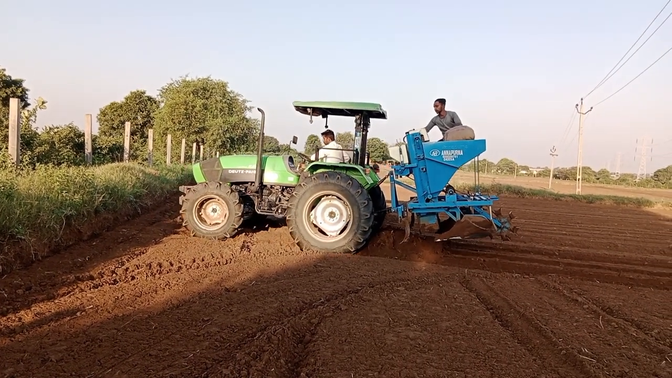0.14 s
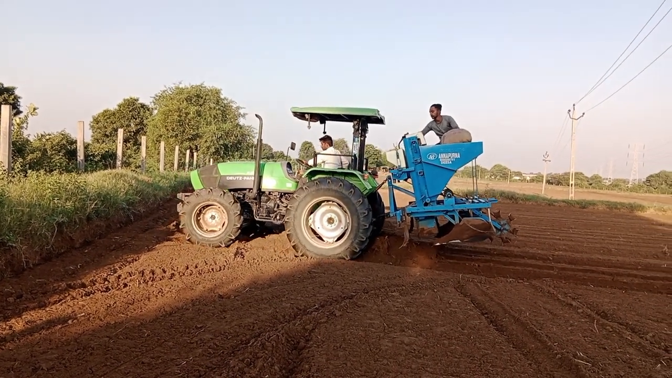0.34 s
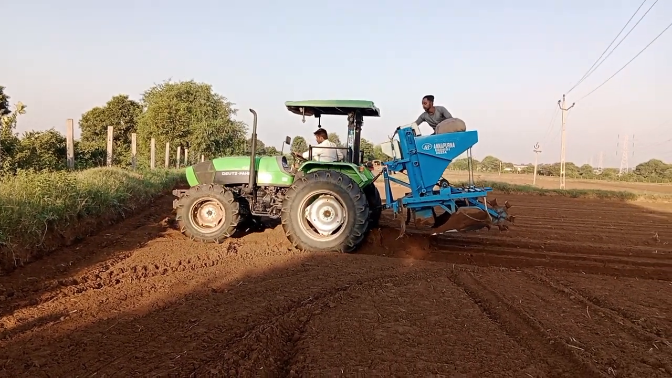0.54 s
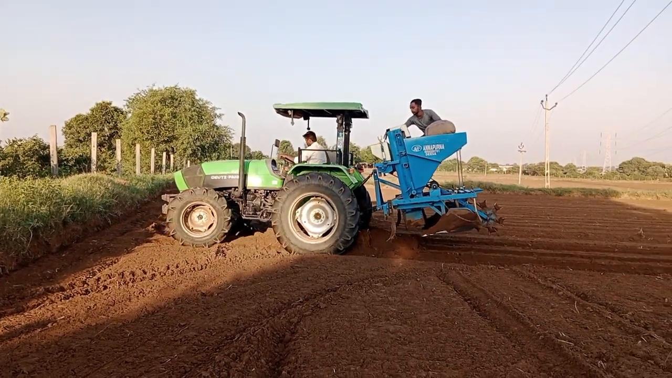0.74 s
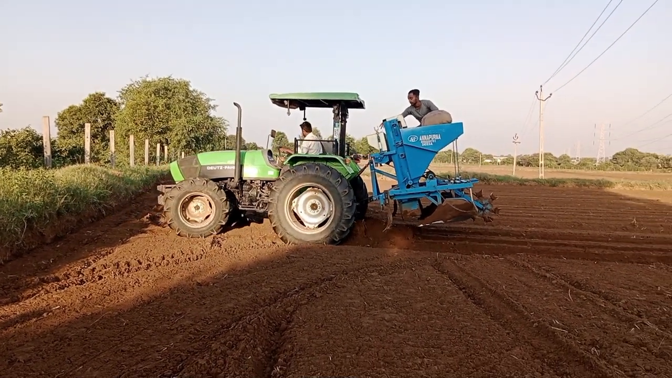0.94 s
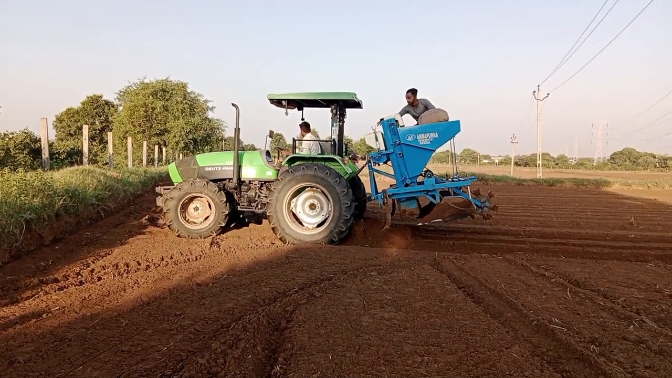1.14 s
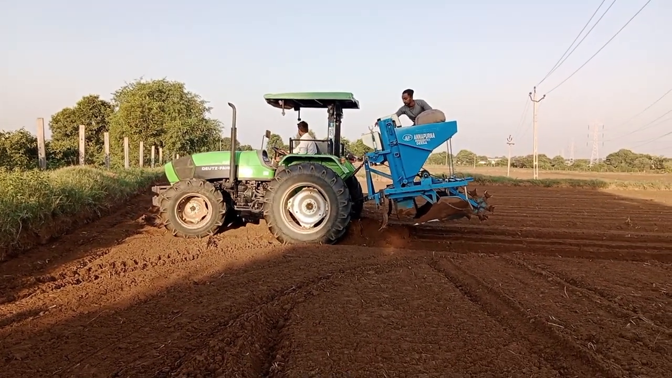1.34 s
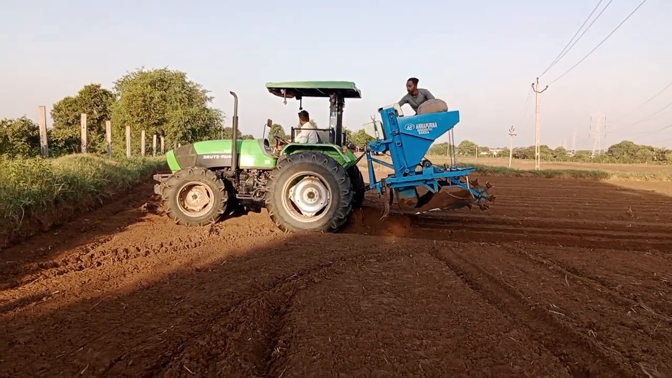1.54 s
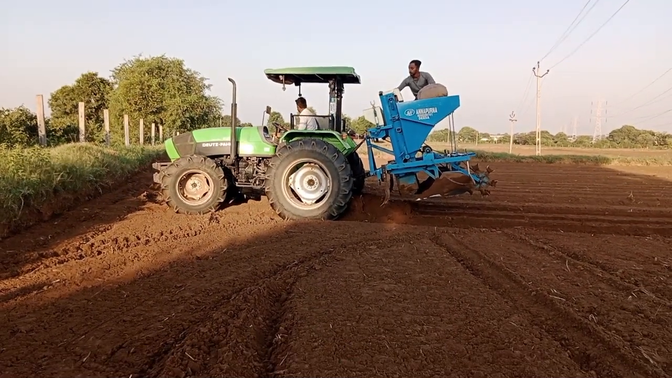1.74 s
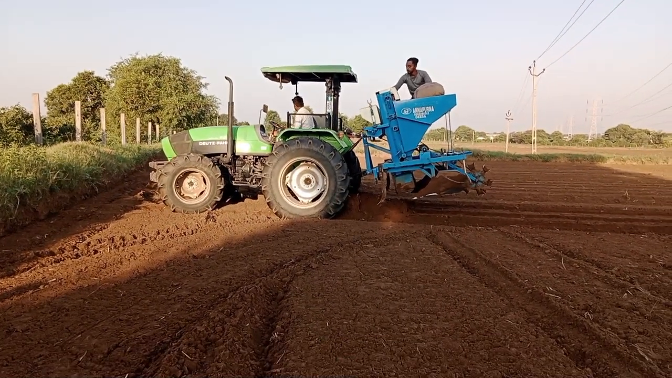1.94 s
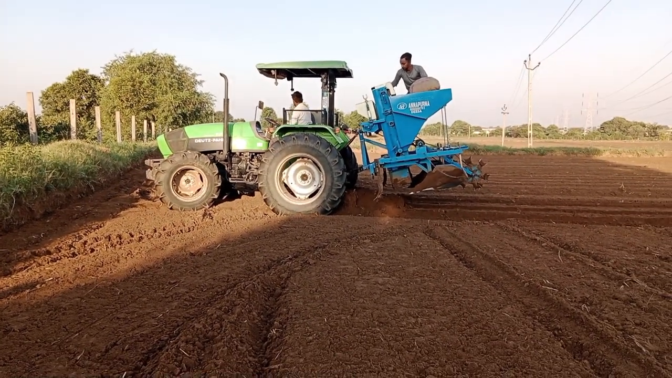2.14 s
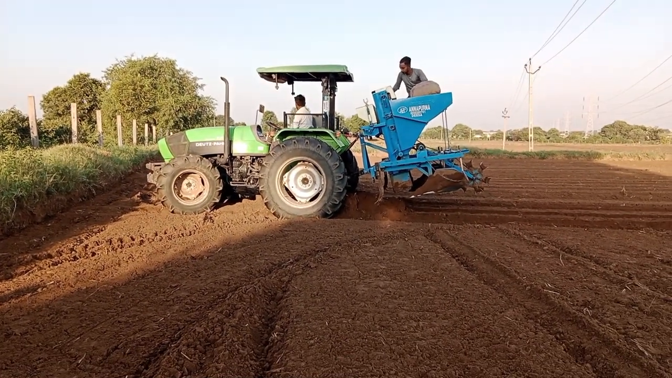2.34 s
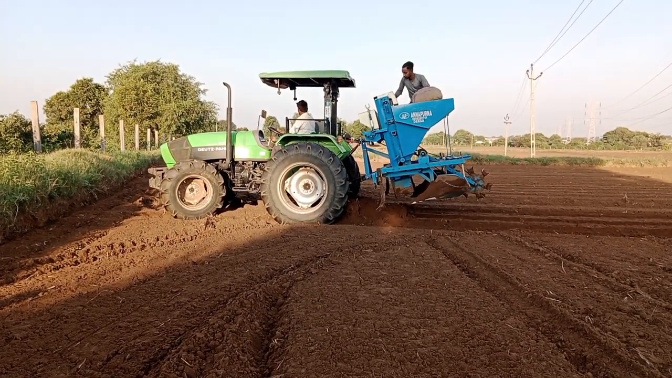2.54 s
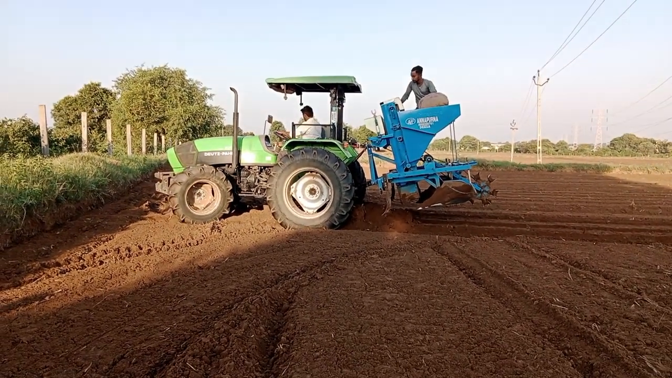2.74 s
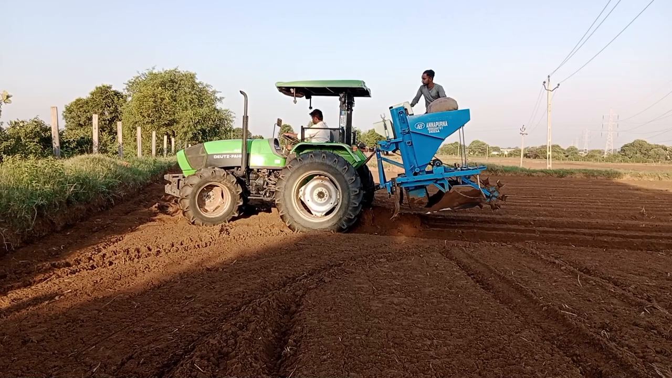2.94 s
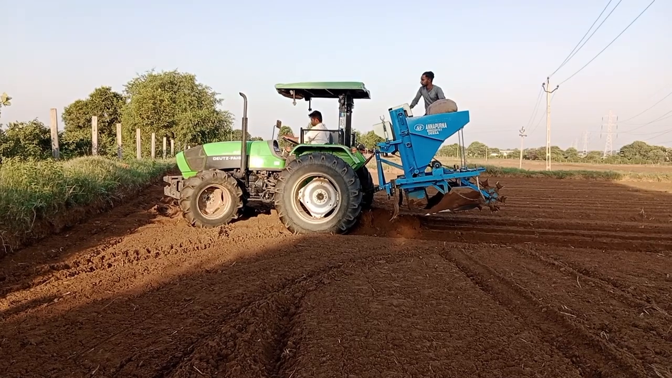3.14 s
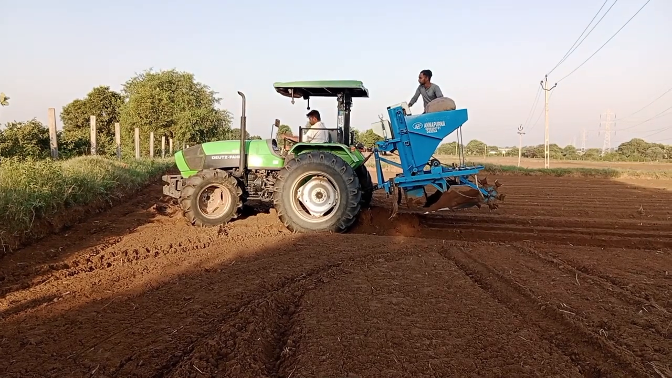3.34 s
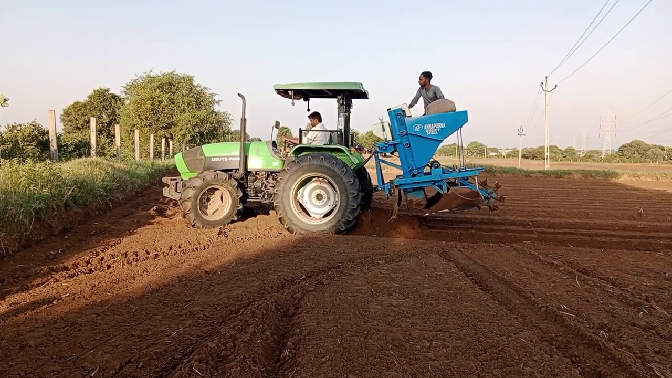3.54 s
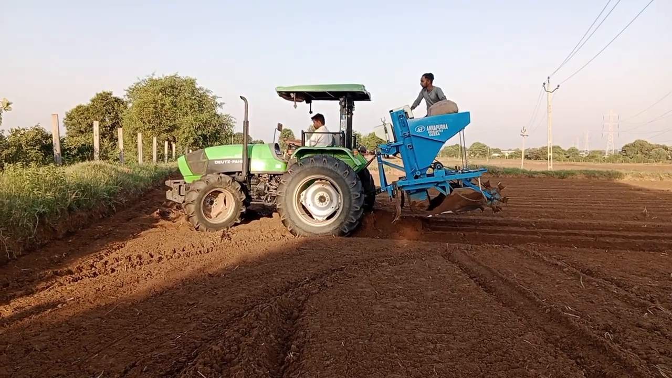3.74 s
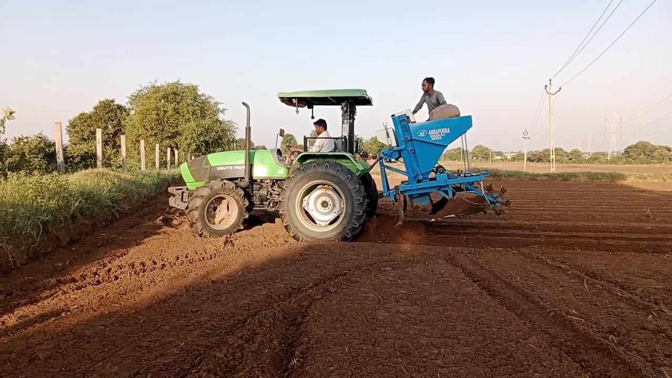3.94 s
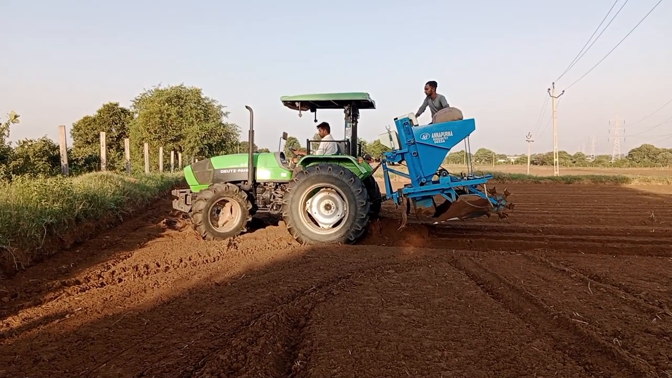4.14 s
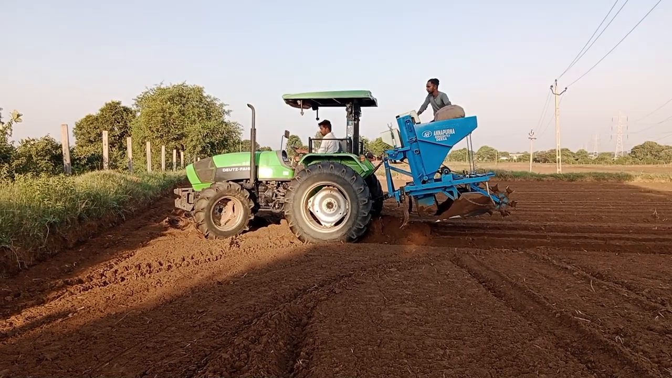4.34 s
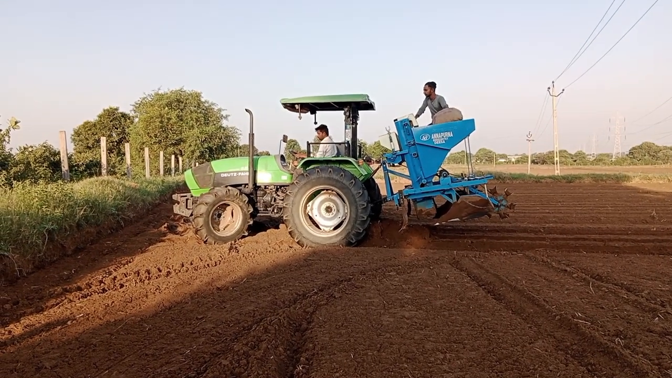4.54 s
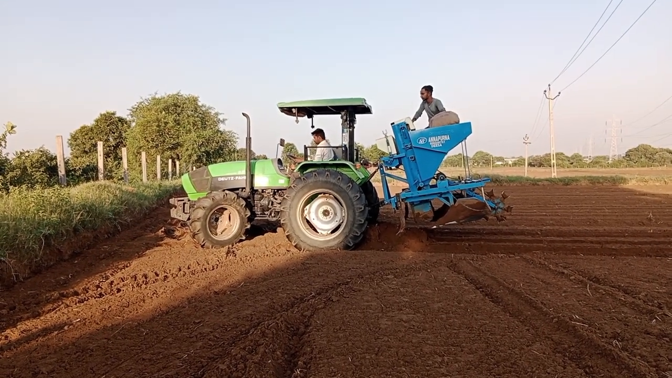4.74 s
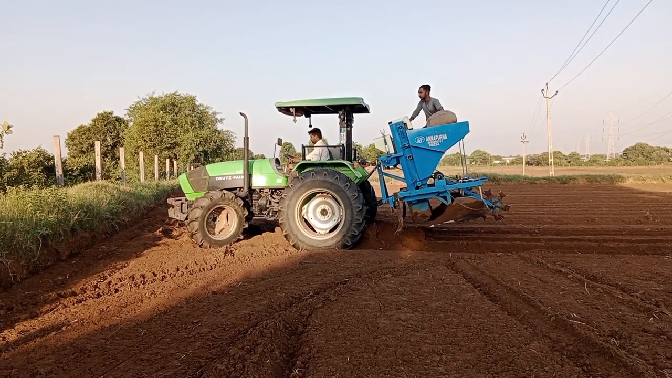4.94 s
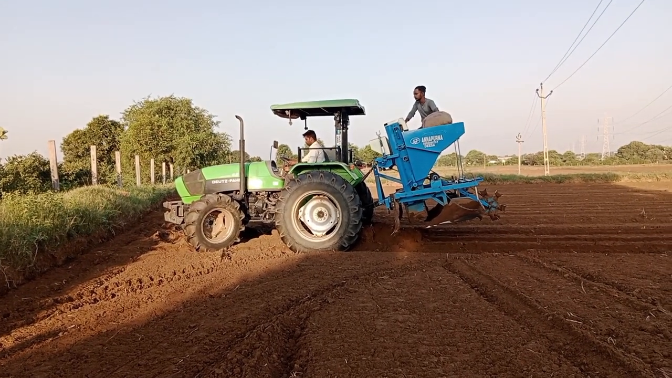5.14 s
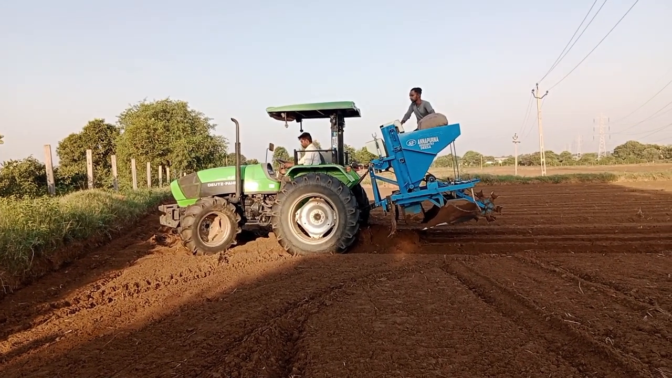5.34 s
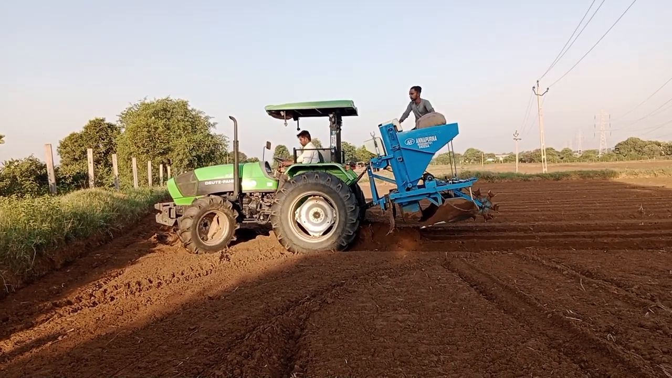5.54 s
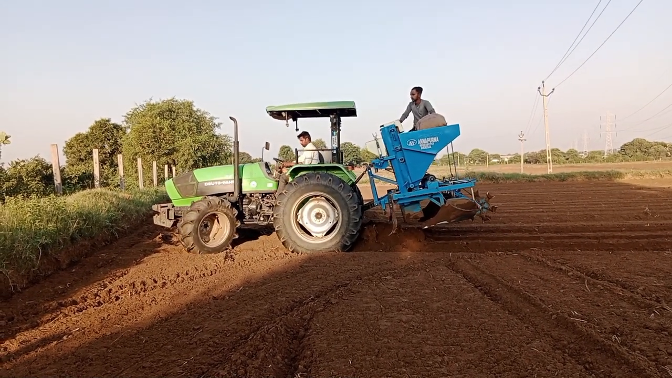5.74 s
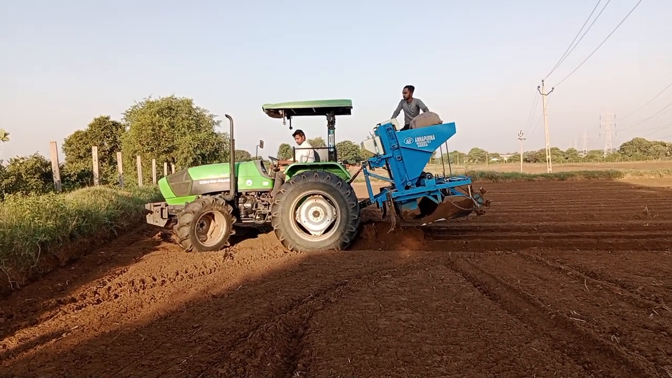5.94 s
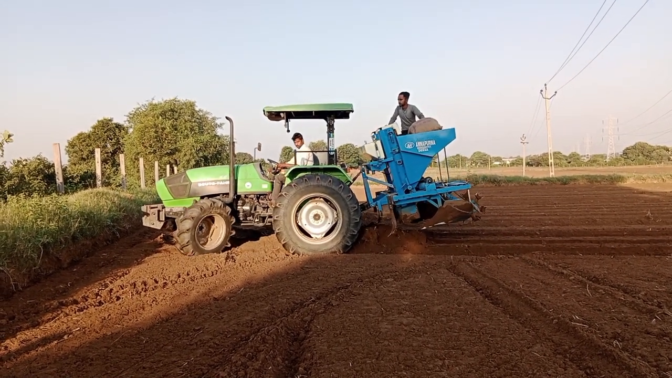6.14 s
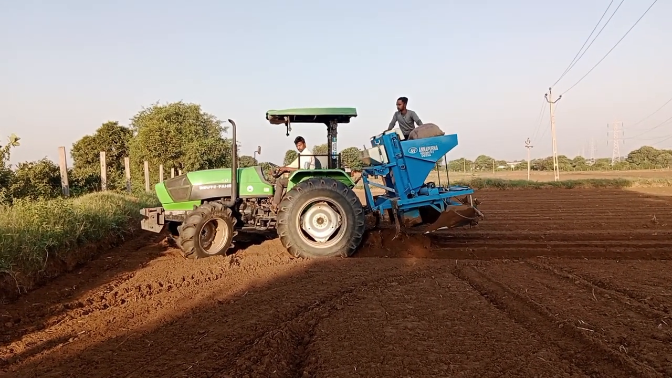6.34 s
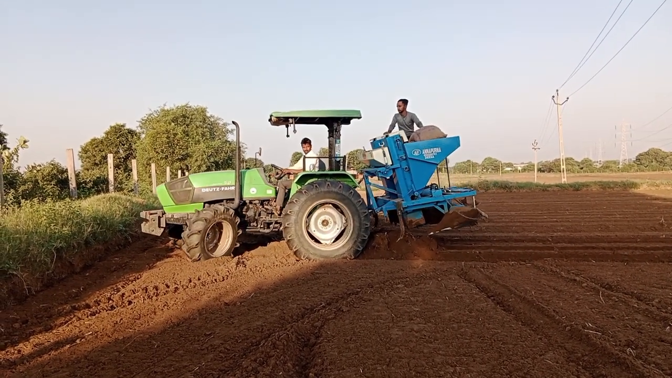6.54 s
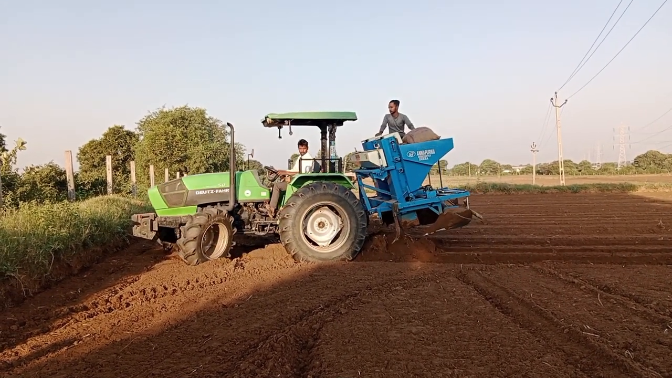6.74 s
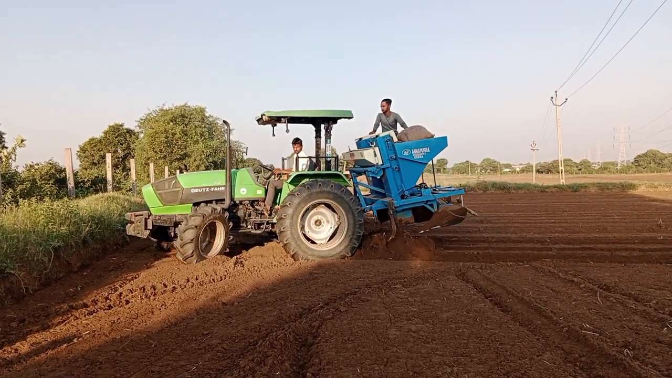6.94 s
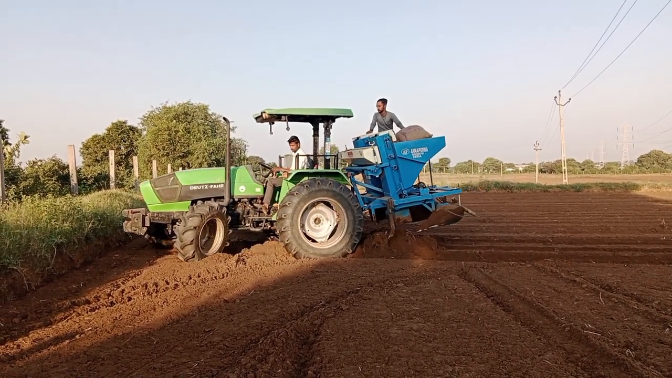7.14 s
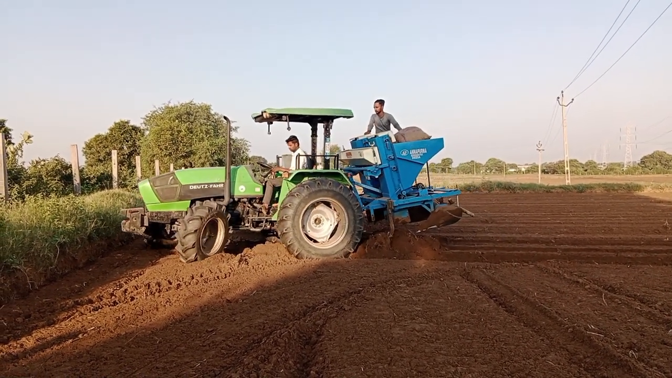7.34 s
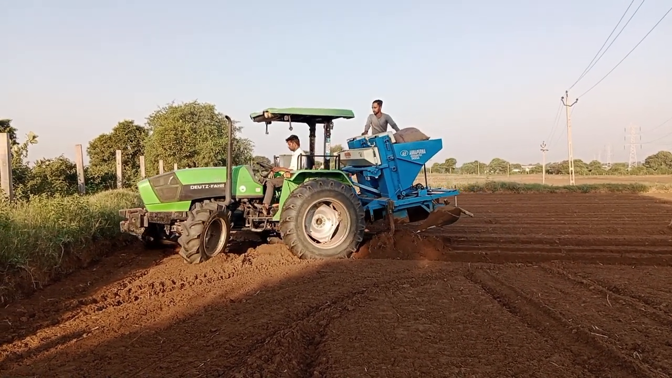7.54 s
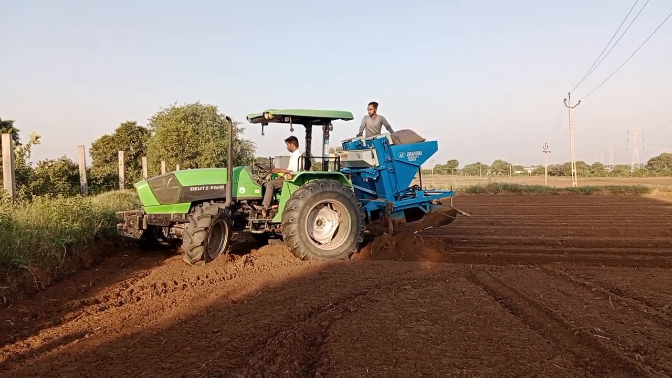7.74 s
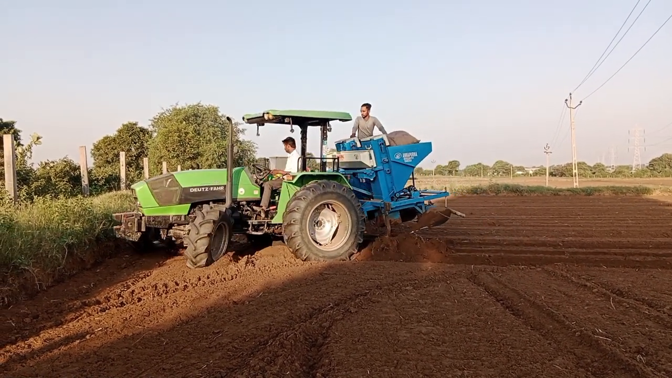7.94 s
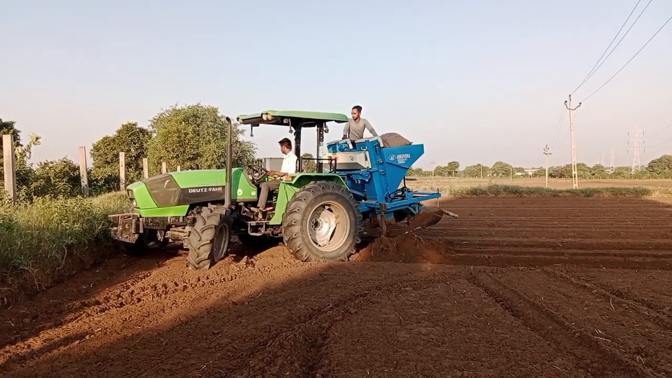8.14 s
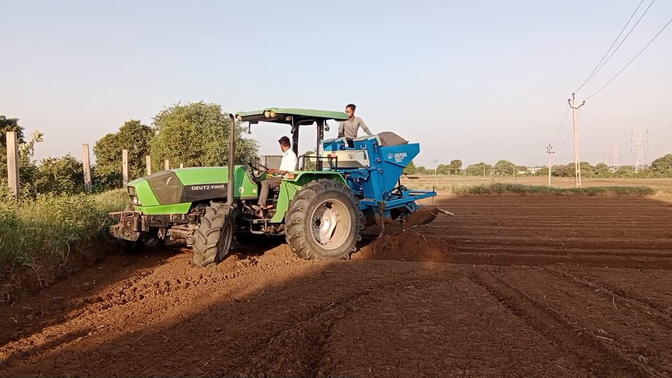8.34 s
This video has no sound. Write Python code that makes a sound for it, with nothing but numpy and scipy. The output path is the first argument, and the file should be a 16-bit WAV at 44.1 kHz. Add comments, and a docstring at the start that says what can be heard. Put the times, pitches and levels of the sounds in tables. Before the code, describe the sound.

A three-cylinder diesel runs at about twenty firings a second, clattering, with a hollow honking pipe and buzzing panels. Bright metal clanks come first, then rough gear grinding midway. The engine quietens slightly, squeaks, dips under load, then pulls harder and closer, with heavy knocks, loose ticks and lumpy earth breaking. Open farmland with faint air, mono, no noticeable echo.

```python
"""In the open air of a field, a three-cylinder diesel tractor creeps along with a planter.
Engine: exhaust pulses, struck castings, a honking pipe and rattling metal, all locked to the crank cycle.
The linkage clanks in a quick cluster and sets a sheet humming, then gear teeth grate for over a second.
The engine takes up load, sags and recovers; its knock grows louder as it comes nearer.
Tyres and tines churn the soil as filtered noise, with thuds of clods, ticks, squeaks and a scrape."""
import sys
import numpy as np
from scipy import signal
from scipy.fft import rfft, irfft, next_fast_len
from scipy.io import wavfile
from scipy.ndimage import uniform_filter1d

SR = 44100
rng = np.random.default_rng(int(sys.argv[2]) if len(sys.argv) > 2 else 0)


def put_to_file(sound):
    """Save the sound as 16-bit audio at rate SR, in the file named by the first command-line argument."""
    columns = np.atleast_2d(sound).T  # one column per channel
    safe = np.clip(columns, -1, 1)
    whole_steps = np.round(safe * 32767)
    wavfile.write(sys.argv[1], SR, whole_steps.astype(np.int16))


N = 370440


def amp(db):
    """Logarithmic level: decibels to amplitude gain."""
    return 10 ** (np.asarray(db) / 20)


def unit(x):
    """Normalisation of mean power: scale to rms 1."""
    return x / np.sqrt(np.mean(x ** 2) + 1e-20)


def clock():
    """Uniform sampling: the time of each sample [s]."""
    return np.arange(N) / SR


def curves(rows):
    """Linear interpolation: one value per sample for each column after the time."""
    s, *columns = np.transpose(rows)
    return [np.interp(clock(), s, column) for column in columns]


def noise():
    """White noise: equal mean power at every frequency."""
    return rng.standard_normal(N)


def wobble(rate):
    """Slow random modulation: straight lines between random knots, rate knots a second."""
    knots = rng.standard_normal(int(N * rate / SR) + 2)
    return np.interp(np.arange(N) * rate / SR, np.arange(len(knots)), knots)


def filtered(x, response):
    """Linear filtering: the spectrum of x times a response of frequency."""
    m = next_fast_len(N + SR // 4)
    return irfft(rfft(x, m) * response(np.fft.rfftfreq(m, 1 / SR)), m)[:N]


def coloured(x, points):
    """Spectral shaping: x through a curve of (frequency [Hz], gain [dB]) points."""
    hz, db = np.transpose(points)
    return filtered(x, lambda f: amp(np.interp(np.log(f + 1), np.log(hz), db)))


def resonance(f, centre, width):
    """Forced resonance: the squared, steep-sided response of one damped mode."""
    return (1j * f * width / (centre * centre - f * f + 1j * f * width)) ** 2


def ring(x, modes):
    """Modal superposition: x through parallel modes (frequency [Hz], width [Hz], gain [dB])."""
    return filtered(x, lambda f: sum(amp(db) * resonance(f, c, w) for c, w, db in modes))


def strikes(times, db):
    """Impulsive excitation: single-sample impulses of given levels."""
    places = np.clip(np.round(np.asarray(times) * SR).astype(int), 0, N)
    return np.bincount(places, amp(db), N + 1)[:N]


def rattle(hits, t60, crack, crack_t60=0.01, rise=0.00039):
    """Multiple impact: each impulse becomes a short crack and a dying shower of tiny contacts."""
    t = np.arange(SR // 4) / SR
    decay = (amp(-60 * t / t60) + crack * amp(-60 * t / crack_t60)) * (1 - np.exp(-t / rise))
    power = signal.oaconvolve(hits ** 2, decay ** 2)[:N]
    return np.sqrt(np.abs(power)) * noise()


def shifting(x, depth_db):
    """Interference: peaks and dips drift as reflections around the moving machine change; rms 1."""
    z = signal.stft(x, nperseg=1024)[2]
    field = uniform_filter1d(rng.standard_normal(z.shape), size=4, axis=0)
    field = uniform_filter1d(field, size=9, axis=1)
    return unit(signal.istft(z * amp(depth_db * unit(field)), nperseg=1024)[1][:N])


# Engine speed: (time [s], firing rate [firings/s])
FIRING_RATE = [(0, 19.56), (.3, 18.63), (.55, 18.58), (1.15, 20.81), (1.7, 21.1), (2.15, 21.37),
               (3.45, 20.31), (4, 20.44), (4.7, 19.94), (5.4, 18.65), (5.7, 15.44), (6.15, 16.99),
               (6.8, 18.27), (7.2, 20.35), (8, 18.91), (8.4, 19.48)]


def turned():
    """Phase accumulation: firings counted so far, from a starting place of 0.72."""
    return np.cumsum(curves(FIRING_RATE)[0]) / SR + .72


# Pull on the engine: (time [s], load [0-1])
ENGINE_LOAD = [(0, 0.05), (5.3, 0.13), (5.8, 0.94), (6.4, 0.94), (8.4, 0.64)]


def crank(place):
    """Periodic excitation: times the three-firing cycle passes a place, and the load at each."""
    times = np.interp(place + 3 * np.arange(56), turned(), clock(), left=-1, right=-1)
    load = np.clip(np.interp(times, *np.transpose(ENGINE_LOAD)), 0, 1)
    # passes outside the scene are moved to its end
    return np.where(times < 0, N / SR, times), load


# Spectrum of the open air: (frequency [Hz], relative level [dB])
AIR_SPECTRUM = [(20, -36), (45, -56), (80, -4), (200, 3.5), (400, -8.5), (900, -32), (3000, -22.5),
                (5000, -40.5), (15000, -36)]


def air(level_db=-71.5):
    """Broadband ambience: steady noise shaped by a fixed spectrum."""
    return amp(level_db) * unit(coloured(noise(), AIR_SPECTRUM))


# Spectrum of churned earth: (frequency [Hz], relative level [dB])
EARTH_SPECTRUM = [(100, -32), (170, -10.5), (270, -7.5), (335, -5), (385, -7), (450, 1), (560, 5),
                  (790, 11.5), (880, -7.5), (940, -15), (1000, 10.5), (1100, 10), (1600, -41),
                  (3500, -91.5)]
# The tines bite hardest at DIG_S; ROLL_DB is the floor left by the tyres alone
DIG_S, DIG_DB, ROLL_DB = 7.27, -44, -74
DIG_RISE_DB_PER_S, DIG_FALL_DB_PER_S = 12.5, 10.5  # slopes away from the rounded crest


def soil(lumpy_db=4.0, rumble_db=-73, crest_s=0.43, ease_db_per_s=30, bite_s=5.47):
    """Granular friction: earth churns in dull lumps as tyres roll and tines bite; load adds a rumble."""
    lumps = shifting(coloured(noise() * amp(lumpy_db * wobble(25)), EARTH_SPECTRUM), depth_db=3.0)
    rumble = curves(ENGINE_LOAD)[0] * unit(ring(noise(), [(53.3, 390, 2.5)]))
    since = clock() - DIG_S
    slope = np.where(since < 0, DIG_RISE_DB_PER_S, DIG_FALL_DB_PER_S)
    dig_db = DIG_DB - slope * (np.hypot(since, crest_s) - crest_s)
    # before the bite the digging falls away more steeply
    dig_db = dig_db - ease_db_per_s * np.maximum(bite_s - clock(), 0)
    return amp(np.maximum(dig_db, ROLL_DB)) * lumps + amp(rumble_db) * rumble


# Breaking clods: (time [s], mean pitch [Hz], relative level [dB])
CLOD_THUDS = [(5.747, 337, -58), (6.331, 279, -56), (6.662, 326, -49), (6.818, 343, -48), (7.111, 331, -47),
              (7.173, 426, -53), (7.225, 228, -54.5), (7.379, 436, -52), (7.491, 490, -42),
              (7.579, 384, -49), (7.799, 446, -45)]


def clods(swell_s=0.019, spread=0.094, level_db=-3):
    """Inharmonic superposition: clods break over the tines, each thud a cluster of detuned partials."""
    out, t = np.zeros(N + SR), np.arange(SR // 6) / SR
    envelope = t / swell_s * np.exp(1 - t / swell_s)
    for s, hz, db in CLOD_THUDS:
        detune, phase = rng.standard_normal((2, 12, 1))
        partials = np.sin(2 * np.pi * (hz * np.exp(spread * detune) * t + phase))
        thud = unit(envelope * partials.sum(axis=0)) * np.sqrt(np.mean(envelope ** 2))
        out[round(s * SR):][:len(t)] += amp(db + level_db) * thud
    return out[:N]


# Squeaks: (time [s], length [s], start pitch [Hz], end pitch [Hz], peak level [dB])
SQUEAK_GLIDES = [(4.898, 0.043, 2550, 1990, -46), (5.382, 0.032, 2540, 2250, -46),
                 (5.422, 0.036, 2550, 1830, -47)]


def squeaks(rough=0.03):
    """Frequency modulation: thin tones hold their pitch, then drop, with a little random roughness."""
    out = np.zeros(N)
    for s, length, start_hz, end_hz, db in SQUEAK_GLIDES:
        u = np.linspace(0, 1, round(length * SR))
        hz = (start_hz + (end_hz - start_hz) * u ** 2) * (1 + rough * wobble(864)[:len(u)])
        tone = np.sin(2 * np.pi * np.cumsum(hz) / SR)
        out[round(s * SR):][:len(u)] += amp(db) * np.sin(np.pi * u) ** .5 * tone
    return out


# Metal ticks: (time [s], impulse level [dB])
PIN_TICKS = [(6.358, -60.5), (6.589, -71), (6.753, -65), (7.362, -63.5), (7.82, -67), (8.135, -63)]


def ticks(t60=.08):
    """Impact on small bodies: loose pins tick thinly, at high modes, as the planter is pulled."""
    contacts = rattle(strikes(*np.transpose(PIN_TICKS)), t60=t60, crack=.4)
    return ring(contacts, [(12200, 2200, 5.5), (8700, 700, -12)])


SCRAPE_S, SCRAPE_LENGTH_S = 5.54, 0.21
SCRAPE_DB, SCRAPE_HISS_DB = -45, -74  # body and sizzle, before the stroke shapes them


def scrape(grain_db=3):
    """Sliding friction: as the load comes on, steel scrapes briefly with a growing thin sizzle."""
    u = np.clip((clock() - SCRAPE_S) / SCRAPE_LENGTH_S, 0, 1)
    stroke = np.sin(np.pi * u) * amp(grain_db * (wobble(90) - .5))
    body = unit(coloured(noise(), [(1000, -40), (1600, 0), (2800, -7.5), (4600, -64)]))
    sizzle = unit(ring(noise(), [(7440, 600, -2), (11500, 400, -8)]))
    return stroke * (amp(SCRAPE_DB) * body + amp(SCRAPE_HISS_DB) * u * sizzle)


# Linkage impacts, heard also in the sheet: (time [s], relative level [dB], t60 of the bright clash [s])
CLANK_HITS = [(1.106, -45.5, 0.19), (1.1915, -41.5, 0.075), (1.209, -44.5, 0.043), (1.364, -59.5, 0.069)]


def hopper(hz=712, t60=0.95, level_db=-0.5, waver=0.012, rise=0.0091):
    """Free vibration: each clank sets a large steel sheet humming in a wavering, decaying mode."""
    out, t = np.zeros(N + SR), np.arange(SR) / SR
    for s, db, _ in CLANK_HITS:
        angle = 2 * np.pi * np.cumsum(hz * (1 + waver * wobble(60)[:SR])) / SR
        envelope = amp(db + level_db - 60 * t / t60) * (1 - np.exp(-t / rise))
        out[round(s * SR):][:SR] += envelope * np.sin(angle)
    return out[:N]


# Spectrum of struck engine castings: (frequency [Hz], relative level [dB])
CASTING_SPECTRUM = [(850, -31), (1100, -7), (1350, -1.5), (1550, 2), (1820, -2.5), (2080, -2), (2450, -5),
                    (2850, -5.5), (3100, -4.5), (3450, -5), (3900, -10), (4200, -23), (4400, -18),
                    (4750, -75), (7000, -64.5)]
# Spectrum of the clashing links: (frequency [Hz], gain [dB])
LINK_SPECTRUM = [(4700, -23), (5600, 5), (7000, 4.5), (8300, 1), (9300, -5), (10600, 5.5), (12000, -19),
                 (15000, -17)]


def linkage(clash_db=1, frame_db=19, thud_db=20):
    """Impact of coupled bodies: links snap taut with a bright clash and a duller clank from the frame."""
    clash = sum(rattle(strikes([s], [db]), t60=t60, crack=0.22, rise=0.0012) for s, db, t60 in CLANK_HITS)
    frame = sum(rattle(strikes([s], [db]), t60=1.5 * t60, crack=.5) for s, db, t60 in CLANK_HITS)
    clash = coloured(clash, LINK_SPECTRUM)
    bright = amp(clash_db) * np.std(clash) * shifting(clash, depth_db=-0.5)
    dull = amp(frame_db) * coloured(frame, CASTING_SPECTRUM)
    thud = amp(thud_db) * ring(frame, [(716, 203, 0), (354, 100, -15.5)])
    return bright + dull + thud


# Modes of the gear: (frequency [Hz], width [Hz], relative level [dB])
GEAR_MODES = [(4530, 38, -22), (5280, 190, 2), (5980, 120, 0), (6530, 340, 1.5), (7410, 48, 9.5),
              (7960, 380, 7.5), (8630, 300, 0), (9500, 89, -16), (10580, 294, 4.5), (11550, 810, -13.5),
              (11600, 610, -7), (12000, 460, -11), (8650, 2900, -14.5)]
# The spell of grating teeth
GRATE_START_S, GRATE_END_S, GRATE_ATTACK_S, GRATE_RELEASE_S = 2.86, 4.19, 0.1, 0.043


def gears(tooth_hz=63.2, ring_db=-68, ring_swell_db=5, casing_db=-46, casing_swell_db=3.0,
          drone_db=-78, drone_swell_db=10):
    """Periodic impact: half-engaged teeth skip, and gear, casing and drone sound hardest midway."""
    times = np.arange(GRATE_START_S, GRATE_END_S, 1 / tooth_hz)
    teeth = strikes(times, rng.normal(0, 1, len(times)))
    # turns rms 1 over the whole scene into rms 1 over the spell
    share = np.sqrt((times[-1] - times[0]) * SR / N)
    since, left = clock() - GRATE_START_S, GRATE_END_S - clock()
    contact = np.clip(np.minimum(since / GRATE_ATTACK_S, left / GRATE_RELEASE_S), 0, 1)
    press = np.sin(np.pi * np.clip(since / (GRATE_END_S - GRATE_START_S), 0, 1))
    grate = rattle(teeth, t60=0.087, crack=1.8, crack_t60=0.033)
    gear = amp(ring_db + ring_swell_db * press) * shifting(ring(grate, GEAR_MODES), depth_db=3.5)
    casing = coloured(rattle(teeth, t60=0.48, crack=0.42), CASTING_SPECTRUM)
    casing = amp(casing_db + casing_swell_db * press) * shifting(casing, depth_db=4.0)
    drone = amp(drone_db + drone_swell_db * press) * unit(ring(grate, [(319.3, 19, 0)]))
    return share * contact * (gear + casing + drone)


# Hard knocks: (time [s], level before colouring [dB], t60 before the closing fade [s], body pitch [Hz])
HARD_KNOCKS = [(.22, -35, 0.064, 1310), (0.7548, -29.5, 0.073, 1250), (0.91, -25, 0.075, 1230),
               (1.006, -27.5, 0.037, 1320), (1.059, -28.5, 0.053, 1210), (1.155, -21, .025, 1190),
               (1.4427, -25, 0.032, 1260), (1.585, -28, 0.074, 1340), (2.056, -29, 0.051, 1210),
               (2.764, -34, .06, 1176), (4.39, -30, 0.15, 1320), (4.914, -35, 0.7, 1320),
               (5.035, -27, 0.044, 1500), (5.503, -23.5, 0.07, 1620), (5.527, -30, 0.22, 1600),
               (6.2492, -15.5, 0.016, 1190), (6.419, -27, 0.022, 1370), (6.877, -26, 0.022, 1500),
               (6.5917, -26, 0.035, 1323), (6.645, -21, .025, 1170), (6.755, -16, 0.022, 1310),
               (6.768, -19, 0.058, 1482), (6.9259, -20, 0.028, 1310), (7.081, -19, .04, 1590),
               (7.277, -17, 0.048, 1121), (7.785, -22.5, 0.058, 1170), (8.299, -19, 0.049, 1320)]


def jolts(body_db=3, clatter_db=-3, top_hz=3700, body_width_hz=360):
    """Transient excitation: single knocks land much harder, each with its own body pitch; under load they fall
    about once an engine cycle."""
    out, t = np.zeros(N + SR), np.arange(SR // 4) / SR
    f = np.fft.rfftfreq(len(t), 1 / SR)
    castings = amp(clatter_db + np.interp(f, *np.transpose(CASTING_SPECTRUM)))
    for s, db, t60, hz in HARD_KNOCKS:
        decay = (amp(-60 * t / t60) + amp(-60 * t / .011)) * (1 - np.exp(-t / 0.0005))
        contacts = decay * rng.standard_normal(len(t))
        colour = amp(body_db) * resonance(f, hz, body_width_hz) + castings
        knock = irfft(rfft(contacts) * colour, len(t)) * (1 - t / t[-1])
        out[round(s * SR):][:len(t)] += amp(db) * knock
    return filtered(out[:N], lambda hz: 1 / (1 + (hz / top_hz) ** 10))


# Shivers in one engine cycle: (place [firings], idling relative level [dB], loaded relative level [dB])
CHATTER_PLACES = [(-.06, -4, 2), (0.7, -1, -14), (.98, -2.5, 2), (1.17, -16.5, -2), (2.08, -6, -3.5),
                  (2.601, -2, -18)]
# Strength of the chatter: (time [s], level [dB])
CHATTER_STRENGTH = [(0, -92), (1.4, -87.5), (1.9, -94.5), (5.4, -99), (6.1, -91.5), (6.6, -81.5),
                    (7.2, -87), (8.4, -82.5)]


def chatter(swell_s=0.0081, scatter_db=3):
    """Amplitude modulation: small loose parts hiss thinly in bursts at set places in the engine cycle."""
    shakes = 0
    for place, idle_db, loaded_db in CHATTER_PLACES:
        times, load = crank(place)
        db = idle_db + load * (loaded_db - idle_db) + rng.normal(0, scatter_db, len(times))
        shakes = shakes + strikes(times, db)
    t = np.arange(-SR // 20, SR // 20) / SR
    envelope = signal.oaconvolve(shakes, np.exp(-(t / swell_s) ** 2), "same")
    grains = envelope * amp(2.5 * wobble(300)) * noise()
    hiss = ring(grains, [(10770, 900, -1), (12000, 1200, 0), (8200, 750, -2)])
    return amp(curves(CHATTER_STRENGTH)[0]) * shifting(hiss, depth_db=3.5)


# Modes of the sheet metal: (frequency [Hz], width [Hz], relative level [dB])
PANEL_MODES = [(5557, 520, 9.5), (6470, 800, 0.5), (6290, 230, -2.5), (7160, 280, 3), (7680, 570, 3.5),
               (11000, 1500, -19.5)]
# Fuel is fed to rev up, eased while the engine coasts, fed again to pull: (time [s], fuel [0-1])
FUEL_FEED = [(0, 0.97), (1.35, 1), (1.75, 0.27), (4.3, 0.1), (5.4, 0.22), (6.1, 0.52), (6.6, 0.96),
             (8.4, 0.86)]
PANEL_DB, PANEL_FUEL_DB = -93, 26  # rattle without fuel; added at full fuel


def panels(scatter_db=2):
    """Forced vibration: loose sheet buzzes once a firing; load makes it later and softer-edged."""
    load, = curves(ENGINE_LOAD)
    buzz = 0
    for mode in PANEL_MODES:
        shakes = 0  # every mode is struck at its own random strengths
        for k, (light_db, heavy_db) in enumerate([(-1.5, 7.0), (1.5, 7.0), (-6.5, 0.0)]):
            times, pull = crank(k - .06)
            db = light_db + pull * (heavy_db - light_db) + rng.normal(0, scatter_db, len(times))
            shakes = shakes + strikes(times + 0.0063 * pull, db)
        loose = rattle(shakes * (1 - load), t60=0.34, crack=1.2, crack_t60=0.033, rise=0.00041)
        taut = rattle(shakes * load, t60=0.085, crack=0, rise=0.02)
        buzz = buzz + ring(loose + 4 * taut, [mode])
    level = amp(PANEL_DB + PANEL_FUEL_DB * curves(FUEL_FEED)[0])
    return level * shifting(buzz * amp(1.8 * wobble(70)), depth_db=6.0)


# Block knock, to which pipe and exhaust refer: (time [s], level before the radiation filter [dB])
KNOCK_LEVEL = [(0, -45), (.9, -45.5), (1.25, -38.5), (1.7, -42.5), (2.4, -39.5), (3.2, -39.5), (3.7, -42.5),
               (4.1, -41.5), (4.3, -45), (5.3, -45), (6.2, -37.5), (6.7, -33.5), (8.4, -33.5)]
# Honk over one engine cycle: (place [firings], pitch at full sweep [Hz], relative level [dB])
HONK_CYCLE = [(.1, 641.4, 1), (0.55, 641.5, 1), (0.999, 685, -3), (1.652, 744, 4.5), (2.099, 758.5, 2),
              (2.602, 699.7, -8.5)]
# Strength of the honk: (time [s], level over the block knock [dB])
HONK_STRENGTH = [(0, -13.5), (.9, -12.5), (1.15, -14), (1.8, -16), (2.35, -19), (2.5, -13), (3.05, -20),
                 (3.4, -12.5), (3.8, -9.5), (4.15, -13), (4.45, -12.5), (4.63, -25.5), (4.9, -10),
                 (5.3, -17), (5.6, -12.5), (6.1, -10), (6.7, -14.5), (8.4, -12.5)]
# Extent of the honk's upward sweep: (time [s], share left [0-1])
SWEEP_SHARE = [(3.9, 1.0), (4.4, .45), (8.4, .4)]
BARK_DB = -11  # at full load, over the block knock


def pipe(width_hz=105, evenness=0.053, bark_hz=637, bark_width_hz=105, steady=0.53, stray=0.2022,
         flutter_db=2):
    """Pipe resonance: noise on a moving pitch honks up once a cycle; under load firings add a low bark."""
    load, = curves(ENGINE_LOAD)
    place, hz, db = np.transpose(HONK_CYCLE)
    cycle = turned() + stray * wobble(9)
    hz, db = (np.interp(cycle, place, column, period=3) for column in (hz, db))
    hz = hz.min() + curves(SWEEP_SHARE)[0] * (hz - hz.min())
    db = db + flutter_db * wobble(12)
    # two slow noises in quadrature make a narrow band around the moving pitch
    gas = np.array([filtered(noise(), lambda f: 1 / (1 + (2 * f / width_hz) ** 2)) for _ in range(2)])
    gas = gas / (np.hypot(*gas) + 1e-9) ** evenness
    angle = 2 * np.pi * np.cumsum(hz) / SR
    honk = unit(amp(db) * (gas[0] * np.cos(angle) + gas[1] * np.sin(angle)))
    puffs = 0
    for place, puff_db in [(.15, 2), (1.1, 0.26), (2.1, -1.4)]:
        times = crank(place)[0]
        puffs = puffs + strikes(times, np.full(len(times), puff_db))
    blast = unit(rattle(puffs, t60=0.27, crack=.2)) + steady * noise()
    bark = unit(ring(blast, [(bark_hz, bark_width_hz, 0), (530, 130, -9)]))
    voice = amp(curves(HONK_STRENGTH)[0]) * honk + amp(BARK_DB) * np.sqrt(np.abs(load)) * bark
    return amp(curves(KNOCK_LEVEL)[0]) * voice


# Exhaust strength of each cylinder: (idling relative level [dB], loaded relative level [dB])
CYLINDER_STRENGTH = [(5, 6), (6, 0.5), (4.5, -1.5)]
THUMP_DB, THUMP_FOLLOWS = -62, 0.42  # mean level; dB gained per dB of knock


def exhaust(idle_hz=113, loaded_hz=101, swell=0.021, lead=0.284, puff_db=-15, puff_hz=64):
    """Pulsed flow: each firing swells and dies in the silencer, lower and more lopsided under load."""
    out, t = np.zeros(N + SR), np.arange(SR // 8) / SR
    envelope = (t / swell * np.exp(1 - t / swell)) ** 3
    for k, (idle_db, loaded_db) in enumerate(CYLINDER_STRENGTH):
        for s, load in zip(*crank(k - lead)):
            hz = idle_hz + load * (loaded_hz - idle_hz)
            puff = amp(puff_db + 1.3 * load + rng.normal(0, 0.54)) * np.sin(2 * np.pi * puff_hz * t)
            wave = np.sin(2 * np.pi * hz * t) + puff
            db = idle_db + load * (loaded_db - idle_db) + rng.normal(0, 1.0)
            out[round(s * SR):][:len(t)] += amp(db) * envelope * wave
    knock_db, = curves(KNOCK_LEVEL)
    return amp(THUMP_DB + THUMP_FOLLOWS * (knock_db - knock_db.mean())) * unit(out[:N])


# Blows in one engine cycle: (place [firings], idling relative level [dB], loaded relative level [dB],
# relative level in each of the four block modes [dB] x 4, relative level of clatter [dB])
CYCLE_BLOWS = [(-.06, 5, -16, 4.5, -13, -12, -11.5, -2), (0.051, 0.5, -16.5, 3.5, 0.5, -9, -14, -2.5),
               (0.151, -2, -1, -3, 0.5, -11, -3.5, 1.5), (.29, -2.5, -6.5, -7.5, -3.5, 2, -9.5, 1),
               (.55, -4.5, -10, -14, -20, 2, -5, 5.5), (0.88, -9.5, -4, 4, -14, -21.5, -16, -13.5),
               (.92, 2, -13, -17.5, 3, -6.5, 1.5, 0), (1.13, -5, 1, -4.5, 1.5, -6.5, 1, -3.5),
               (1.3, -5.5, -10, -20, -18, 8, -6, 4.5), (1.58, -5, -7.5, -19, -5.5, -7, -14, 2),
               (1.93, 4.5, -16.5, -12.5, 2, -5, 2, -2), (2.1, -2, -2, -1.5, 0, -9.5, -4, 2.5),
               (2.27, -3.5, -6.5, -2, -6, -5, -9, 4), (2.48, -2.5, -6.5, -9, -19, 0, -7, 2.5)]
# Modes of the engine block: (frequency [Hz], width [Hz])
BLOCK_MODES = [(1180, 155), (1300, 170), (1740, 410), (2520, 580)]
# Lowest block mode, which fades while coasting: (time [s], gain [dB])
LOW_MODE_GAIN = [(4.2, -2.5), (4.4, -23), (5.6, -2), (6.2, 4)]


def blows(alike=0.881, t60=0.16, crack=1.1, crack_t60=0.056, clean=0.72, scatter_db=1.32,
          jitter=.0005, size=4096):
    """Modal excitation: each blow rings the castings its own way, almost as it did one cycle before."""
    out, f = np.zeros(N + SR), np.fft.rfftfreq(size, 1 / SR)
    lead = size // 32  # samples before the blow
    t = np.maximum(np.arange(size) - lead, 0) / SR
    decay = (amp(-60 * t / t60) + crack * amp(-60 * t / crack_t60)) * (1 - np.exp(-t / .0007))
    hz, db = np.transpose(CASTING_SPECTRUM)
    castings = amp(np.interp(np.log(f + 1), np.log(hz), db))
    even = lambda z: z / np.sqrt(np.mean(np.abs(z) ** 2, axis=1, keepdims=True))
    for place, idle_db, loaded_db, *mode_db, clatter_db in CYCLE_BLOWS:
        times, load = crank(place)
        # smoothing across cycles makes successive blows alike
        contacts = signal.lfilter([1], [1, -alike], rng.standard_normal((len(times), size)), axis=0)
        ragged = even(rfft(contacts * decay))
        thock = ragged + clean * np.exp(-2j * np.pi * f * lead / SR)  # adds one clean impulse
        modes = [amp(db) * even(thock * resonance(f, *mode)) for mode, db in zip(BLOCK_MODES, mode_db)]
        modes[0] = modes[0] * amp(np.interp(times, *np.transpose(LOW_MODE_GAIN)))[:, None]
        rings = irfft(sum(modes) + amp(clatter_db) * even(ragged * castings))
        late, force = rng.standard_normal((2, len(times)))
        levels_db = idle_db + load * (loaded_db - idle_db) + scatter_db * force
        for s, db, wave in zip(times + jitter * late, levels_db, rings):
            out[max(round(s * SR), 0):][:size] += amp(db) * wave
    return unit(out[lead:][:N])


# Treble edge of the knock: (time [s], gain [dB])
EDGE_GAIN = [(0, 1), (1.7, 3.5), (2.5, -8.5), (4.1, -17.5), (4.4, -17), (5.7, -20), (6.5, -3.5),
             (8.4, -3.5)]


def block(idle_clatter_db=-10.0, loaded_clatter_db=-5.5, edge_hz=4020, edge_width_hz=420,
          hush_db=2.0, hush_place=0.88, hush_width=0.081):
    """Structure-borne sound: combustion and piston slap over valve clatter that thickens under load."""
    load, = curves(ENGINE_LOAD)
    clatter = shifting(coloured(noise(), CASTING_SPECTRUM), depth_db=5.0)
    clatter = amp(idle_clatter_db + load * (loaded_clatter_db - idle_clatter_db)) * clatter
    knock = shifting(blows(), depth_db=3.5) + clatter
    # the sound lulls during compression, just before each firing; load makes the firing later
    from_lull = (turned() - hush_place - 0.075 * load + .5) % 1 - .5
    knock = unit(knock * amp(-hush_db * np.exp(-(from_lull / hush_width) ** 2)))
    # harder combustion brightens the edge
    edge = filtered(knock, lambda hz: 1 / (1 + np.abs((hz - edge_hz) / edge_width_hz) ** 10))
    knock = knock + (amp(curves(EDGE_GAIN)[0]) - 1) * edge
    # the lows are held back, most at 930 Hz by the ground bounce; heavy castings radiate little treble
    radiation = [(750, -15.0), (930, -18.0), (1090, -3.0), (4400, -2.5), (6000, -65)]
    return amp(curves(KNOCK_LEVEL)[0]) * coloured(knock, radiation)


def scene():
    """Linear superposition: air, planter, gears and engine add in the open field."""
    planter = soil() + clods() + squeaks() + ticks() + scrape() + hopper() + linkage()
    engine = chatter() + panels() + pipe() + exhaust() + block()
    return (air() + planter + gears() + jolts() + engine)[None]


def record(dry):
    """Band limitation: nothing at or above 15.5 kHz passes."""
    return np.array([filtered(channel, lambda hz: hz < 15500) for channel in dry])


dry = scene()
out = record(dry)
put_to_file(out)
```